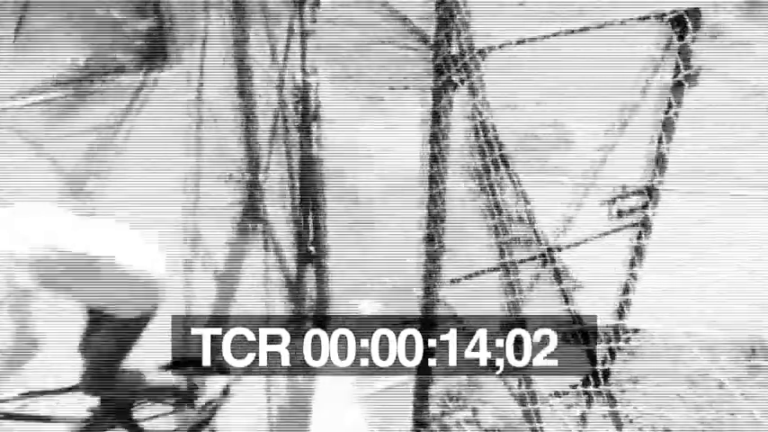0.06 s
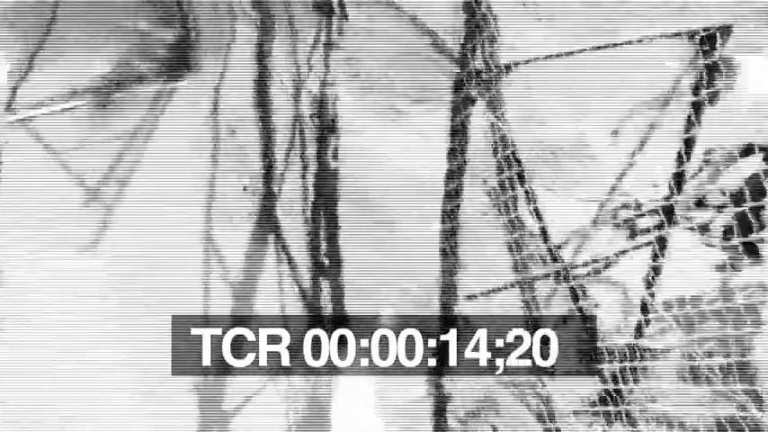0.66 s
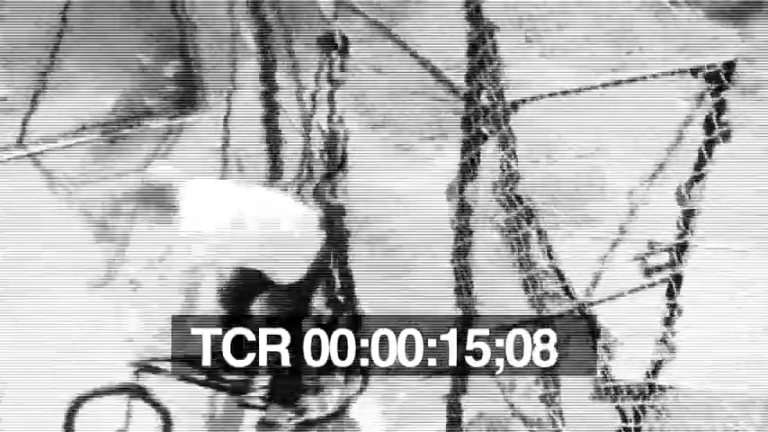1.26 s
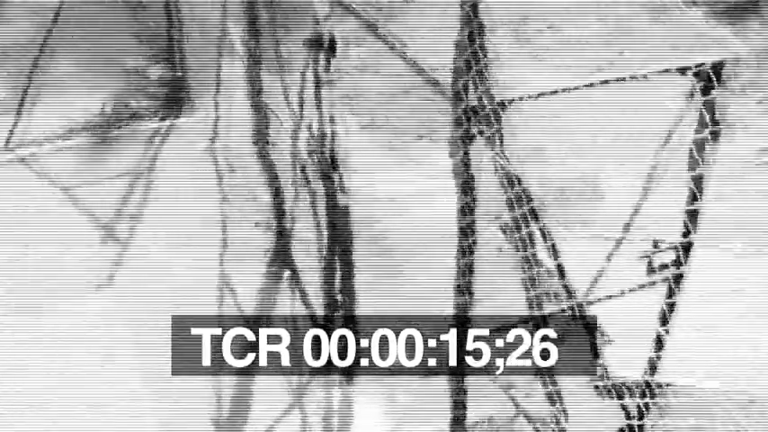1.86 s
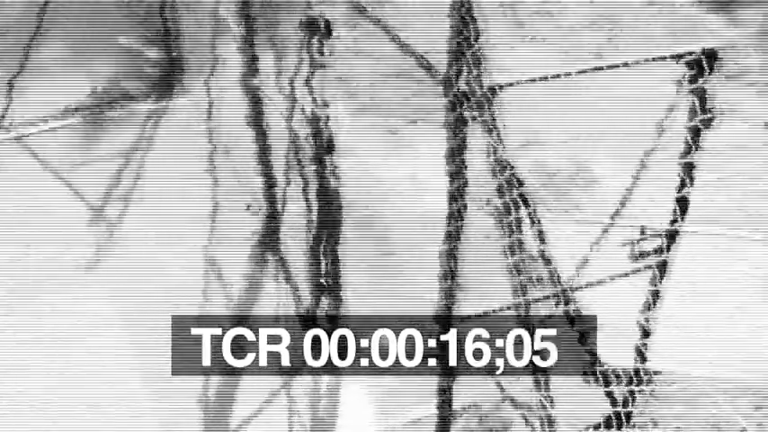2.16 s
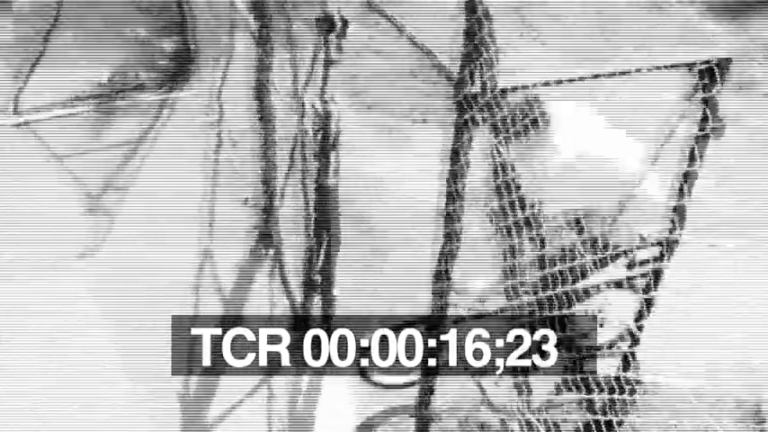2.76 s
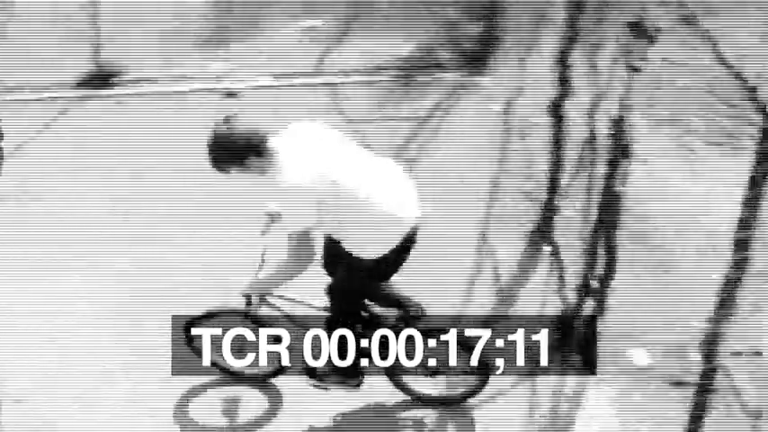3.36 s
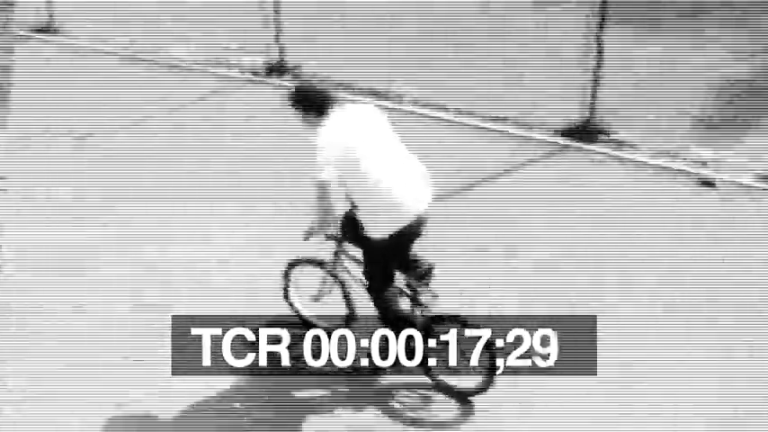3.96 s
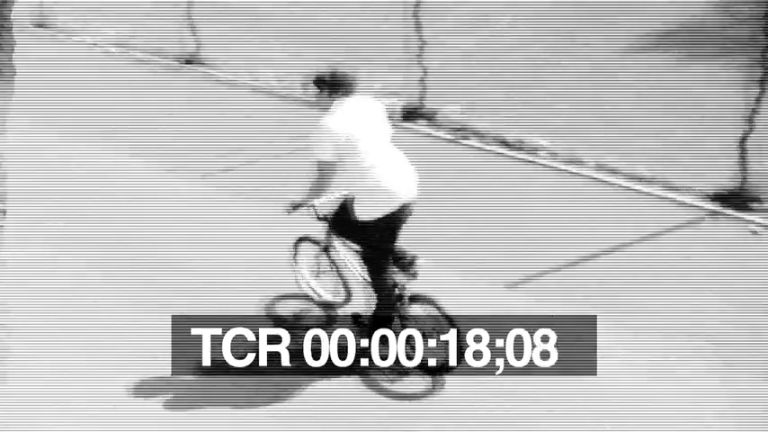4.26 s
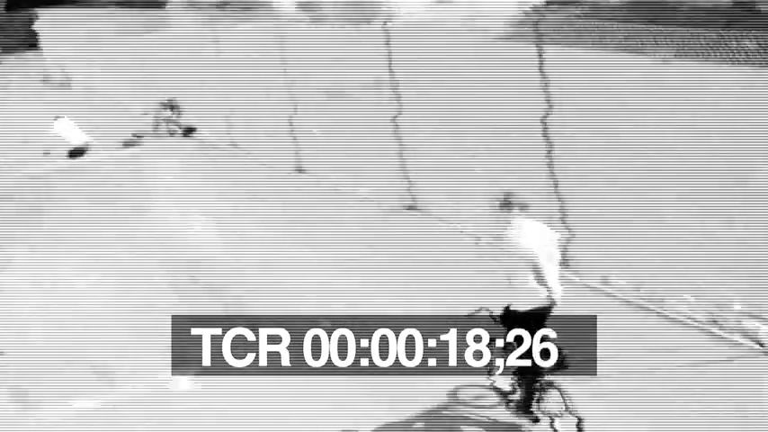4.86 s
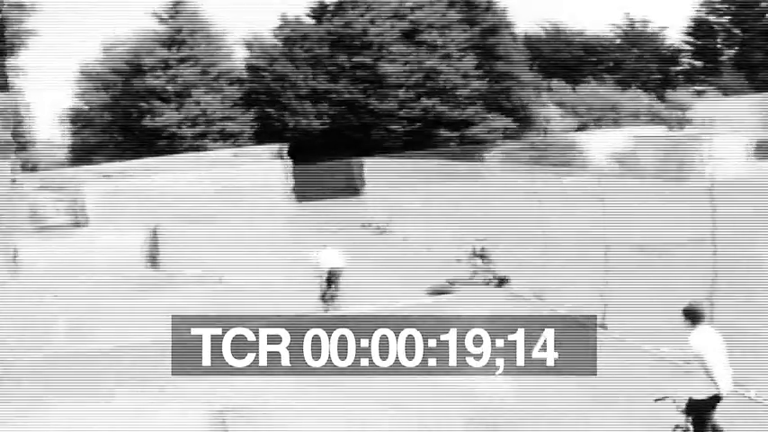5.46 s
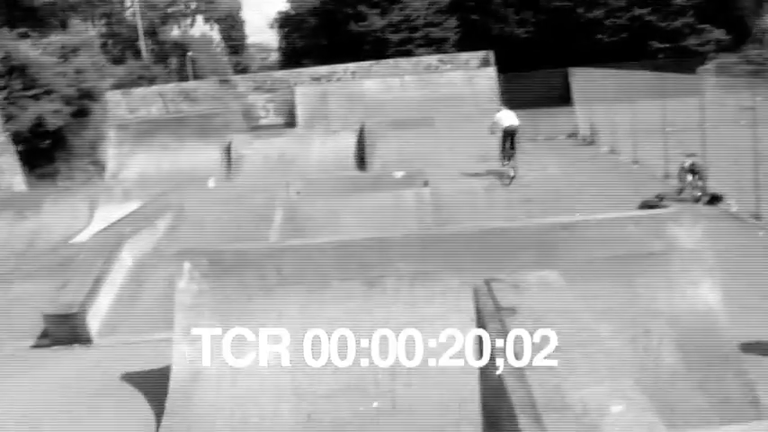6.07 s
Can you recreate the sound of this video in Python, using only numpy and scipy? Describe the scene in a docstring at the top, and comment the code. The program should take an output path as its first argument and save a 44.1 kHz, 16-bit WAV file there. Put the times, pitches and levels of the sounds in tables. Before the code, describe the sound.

Bikes coast past one after another at an outdoor concrete skate park. Each pass swells and fades, with freewheels ticking faster and slower over the rush of tyres. Chains and frames clack, and gusts thump the microphone, mostly on the left. Past the middle a rider pedals briefly and the chain jangles. Near the end a bike lands with a woody crack as another pass builds.

```python
"""BMX bikes coast past one after another at an outdoor concrete skate park. From the start, each pass
swells and fades: freewheel pawls tick with wheel speed and ring the hub, tyres roar, chains and frames
clack. Gusts thump the microphone, mostly its left port, hardest near 0.4 s. A slack chain ticks from
1.6 s; rubber squeaks at 3 s. Around 4 s a rider pedals: the pawls fall silent and the chain jangles.
At 5.8 s a bike lands with a woody crack as the last pass swells."""
import sys
import numpy as np
from scipy import signal
from scipy.fft import rfft, irfft, next_fast_len
from scipy.io import wavfile
from scipy.ndimage import uniform_filter1d

SR = 44100
rng = np.random.default_rng(int(sys.argv[2]) if len(sys.argv) > 2 else 0)


def wrap_up_sound(samples):
    """Save the sound to the file named by the first command line argument, as 16-bit audio."""
    columns = np.atleast_2d(samples).T
    # keep every value between -1 and 1, then stretch to whole-number steps
    tamed = np.clip(columns, -1, 1)
    steps = np.round(tamed * 32767).astype(np.int16)
    wavfile.write(sys.argv[1], SR, steps)


N = 270333
TIME = np.arange(N) / SR
PASS_CURVE, GUST_CURVE = 0.91, 1.7   # swell exponents: passes near linear, gusts pointed

# Spectra of the sources. Each row: frequency in Hz, relative density in dB.
AIR_SPECTRUM = [(40, 3), (120, -4), (400, -18), (1000, -7.5), (3000, -10.5), (8000, -16.5), (15500, -20.5)]
WIND_SPECTRUM = [(24, -99), (45, -34), (114, -8.5), (165, 1.5), (290, 5), (450, -3.5), (590, -10.5),
                 (760, -22.5), (930, -24.5), (1300, -40), (1690, -55), (2860, -120)]
TYRE_SPECTRUM = [(50, -25), (150, -8), (300, -5), (480, 2), (760, -2), (1160, -4.5), (2000, -10),
                 (3000, -9.5), (5400, -19), (7500, -21.5), (15500, -38.5)]
GRIT_SPECTRUM = [(1000, -36), (2500, -2), (5000, -3), (8000, 0), (12000, -7.5), (15500, -3)]
WOODY_SPECTRUM = [(290, -16), (500, -3.5), (900, 2.5), (1340, -0.5), (1990, -5.5), (2310, -15), (3130, -16),
                  (4730, -7), (6340, -15), (8840, -29), (15500, -40)]
FRAME_SNAP_SPECTRUM = [(880, -22), (1500, -23), (2720, 8), (3540, 3.5), (5610, -3.5), (6430, 2.5),
                       (8460, 0), (10100, -1), (15500, -18)]
FRAME_KNOCK_SPECTRUM = [(290, -37), (500, -1), (1120, -12.5), (1320, -1), (1740, 0), (2010, -1), (2280, -3),
                        (2600, -42), (3380, -45), (5720, -120)]
SPROCKET_SPECTRUM = [(880, -37), (1500, -3.5), (2020, -3), (2360, -6.5), (2930, 4.5), (3970, -20),
                     (4980, -10), (6470, -10), (7500, -13), (8700, -13.5), (9820, -18), (10200, -27),
                     (12000, -25), (15600, -43), (22000, -120)]
CHAIN_SPECTRUM = [(2000, -23), (4000, 3.5), (8000, -5.5), (11800, 1.5), (14500, -21), (15500, 4)]

# Gusts, mostly bike wakes. Each row: start, peak and end in seconds, level in dB.
GUSTS = [(-0.35, 0.41, 0.94, -35), (0.9, 1.45, 2.25, -39), (1.88, 2.4, 2.93, -41), (3.13, 3.45, 3.46, -65),
         (3.4, 4.22, 4.57, -41.5), (4.5, 4.76, 4.93, -54), (4.6, 5.35, 5.9, -67.5), (5.78, 5.81, 6.16, -46)]
# Wind at the two ports. Each row: time in seconds, left over right in dB, deep bass gain in dB.
WIND_BALANCE = [(0, 20, 9.5), (.8, 12, 3), (1.401, 10, 1), (2, 10, 7), (2.801, 7, 5), (3.3, 1, 13.5),
                (4.2, 8, 8), (4.5, 0, 11), (5.6, 0.5, 9), (5.9, 0.5, 8.5), (6.03, -24, 10.5),
                (6.13, 10.5, 10)]
# Cavities behind the microphone grille. Each row: frequency in Hz, gain in dB.
HOUSING_MODES = [(450, -5.5), (587, -6), (727, -15), (775, -4.5)]
# Big eddies; smaller ones sound higher.
# Each row: time in seconds, level in dB, nominal pitch in Hz, swirl length in seconds.
THUMPS = [(0.044, -22, 343, 0.019), (0.099, -33, 260, 0.0048), (0.143, -22.0, 274, 0.0054),
          (0.164, -26, 220, 0.0029), (0.191, -24.5, 250, 0.024), (0.244, -20.5, 212, 0.038),
          (0.296, -17.5, 277, 0.028), (0.312, -19.0, 230, 0.024), (0.362, -14.5, 283, 0.059),
          (0.389, -5, 346, 0.026), (0.405, -8.5, 422, 0.026), (0.418, -13, 312, 0.038),
          (0.431, -16.5, 380, 0.018), (0.453, -12, 290, 0.055), (0.528, -12.5, 340, 0.0044),
          (0.538, -12, 320, 0.011), (0.563, -21, 280, 0.053), (0.578, -32, 370, 0.023),
          (0.599, -21, 372, 0.0092), (0.613, -21, 347, 0.0032), (0.66, -23, 338, 0.0059),
          (0.689, -38, 240, 0.017), (0.71, -32.0, 280, 0.005), (0.849, -43, 270, 0.011),
          (0.897, -39.5, 280, 0.009), (0.946, -33.5, 423, 0.004), (0.976, -42.5, 350, 0.007),
          (1.042, -42, 250, 0.03), (1.077, -36, 260, 0.03), (1.111, -36, 280, 0.02),
          (1.125, -42, 278, 0.007), (1.204, -31, 300, 0.015), (1.227, -27.5, 260, 0.025),
          (1.285, -23, 306, 0.033), (1.323, -24.5, 260, 0.028), (1.372, -21, 336, 0.023),
          (1.403, -14.5, 435, 0.0068), (1.425, -16.5, 304, 0.054), (1.443, -22.0, 420, 0.021),
          (1.462, -20, 332.6, 0.025), (1.474, -24, 330, 0.0037), (1.496, -23, 334, 0.032),
          (1.544, -15, 400, 0.011), (1.56, -14.5, 368, 0.012), (1.581, -21.5, 320, 0.0044),
          (1.631, -29, 300, 0.018), (1.663, -18.5, 300, 0.036), (1.68, -20, 310, 0.038),
          (1.692, -27, 290, 0.007), (1.725, -26, 313, 0.04), (1.737, -25.5, 302, 0.04),
          (1.826, -27, 363, 0.032), (1.847, -28.5, 292.4, 0.009), (1.903, -33, 356, 0.0071),
          (1.927, -31.5, 368, 0.025), (1.999, -41, 367, 0.008), (2.021, -38, 370, 0.012),
          (2.091, -33.5, 390, 0.004), (2.101, -30.5, 332, 0.045), (2.227, -27.0, 286, 0.0033),
          (2.295, -29.5, 320, 0.017), (2.324, -19.5, 313, 0.006), (2.346, -27, 300, 0.015),
          (2.362, -19.5, 328, 0.008), (2.376, -27, 322, 0.04), (2.392, -23, 283, 0.008),
          (2.413, -25.5, 322, 0.029), (2.445, -26.5, 400, 0.022), (2.544, -19.5, 290, 0.033),
          (2.561, -19.5, 296, 0.0032), (2.604, -30.5, 271, 0.007), (2.688, -29, 286.7, 0.014),
          (2.707, -27, 276, 0.017), (2.749, -28, 350, 0.04), (2.768, -24.5, 258, 0.017),
          (2.787, -33.5, 294, 0.037), (2.801, -27.5, 287, 0.0056), (2.839, -34.5, 288, 0.01),
          (2.868, -41, 240, 0.014), (2.884, -38, 290, 0.0052), (2.905, -36, 306, 0.0065),
          (3.77, -28.5, 327, 0.008), (3.936, -28, 260, 0.031), (3.964, -27.0, 252, 0.025),
          (4.026, -36, 290, 0.017), (4.105, -23, 470, 0.0051), (4.125, -21.5, 300, 0.007),
          (4.154, -20, 290, 0.03), (4.173, -26, 262, 0.035), (4.198, -19.0, 294, 0.012),
          (4.224, -26.0, 280, 0.007), (4.254, -21, 365, 0.02), (4.271, -27, 330, 0.04),
          (4.305, -22.5, 255, 0.053), (5.616, -40, 340, 0.04), (5.629, -48.5, 326, 0.033),
          (5.805, -37, 282, 0.015), (5.836, -37, 275, 0.024), (5.892, -38, 340, 0.015),
          (5.949, -38, 265, 0.038), (6.032, -27.5, 220, 0.032), (6.042, -28.5, 262, 0.004)]
# Tyres crossing the concrete. Each row: start, peak and end in seconds, level in dB.
TYRE_RUNS = [(-0.03, 0.43, 0.8, -46.5), (1.04, 1.42, 1.98, -53), (1.99, 2.38, 3.14, -54),
             (2.94, 3.02, 3.15, -57), (3.18, 4.44, 4.91, -45), (4.73, 5.3, 5.78, -58),
             (5.72, 6.12, 6.5, -52)]
# Rubber slip: start, peak and end in seconds.
SQUEAK_S = (2.9, 3.05, 3.19)
# Short hollow knocks: a sharp wind slap on the microphone at 0.4 s, then wheels bumping ramps.
# Each row: time in seconds, level in dB, pitch in Hz, t60 in seconds.
HOLLOW_KNOCKS = [(0.402, -19, 800, .012), (0.944, -36.5, 586, 0.013), (0.972, -54, 600, .01),
                 (2.964, -49, 724, 0.05), (2.977, -41, 510, 0.048), (3.022, -41.5, 467, 0.029),
                 (3.034, -50, 466, 0.048), (3.055, -49, 447, .025), (3.817, -44, 627, 0.1),
                 (3.889, -37, 620, 0.076), (5.588, -39, 570, 0.027), (5.599, -35.5, 540, 0.027)]
# Touchdown of each wheel. Each row: time in seconds, level in dB, t60 in seconds.
LANDING_HITS = [(5.7955, -30.5, 0.0088), (5.7982, -38, 0.013)]
# Chain and frame hits. Each row: time in seconds, level in dB, low knock offset in dB, t60 in seconds.
CLACKS = [(0.486, -34, -20, 0.045), (0.5348, -25.5, -11, 0.027), (0.7563, -29, -5.5, 0.014),
          (0.791, -52, 8, 0.022), (1.061, -44, 0, 0.036), (1.091, -56, 14, 0.02), (1.1154, -45, -4, 0.031),
          (1.1544, -41, 4.5, 0.055), (1.824, -38.5, -6, 0.017), (2.051, -35.5, -10, 0.016),
          (2.2655, -25.5, -4, 0.029), (2.381, -28.5, -2, 0.047), (2.574, -31, -4, 0.025),
          (2.964, -56, 15, 0.04), (2.974, -55, 11, 0.025), (3.713, -39, -16, 0.024),
          (3.7322, -44, -14, 0.02), (3.7566, -33.5, -2, 0.026), (4.012, -27, -4.5, 0.042),
          (5.7956, -30.5, -1, 0.017), (5.816, -44, 2, 0.02), (6.0524, -31, -14, 0.025)]
# Chain on sprocket. Each row: time in seconds, level in dB, t60 in seconds.
CLINKS = [(3.028, -35, 0.069), (3.063, -45, 0.05), (3.8338, -29, 0.033), (4.0486, -25, 0.08),
          (4.078, -31, 0.11), (4.104, -35.5, 0.08)]
# Chain on its guide: first tick and interval in seconds, first level in dB, loss per tick in dB.
CHAIN_RUN = (1.58, .041, -40.5, 1)

# Spectra radiated by hub and frame. Each row: frequency in Hz, relative density in dB.
HUB_A = [(590, -29), (1000, -11), (1230, -18), (1530, -5.5), (1820, 1), (2390, 0.5), (2680, -4.5),
         (2970, 0), (4540, -0.5), (5340, -9), (5980, -4.5), (7110, 3.5), (11900, -10.5), (13100, -10),
         (15500, -19)]
HUB_B = [(880, -34), (1500, -3), (1860, -5.5), (2150, -10), (3090, -1.5), (4480, -7), (4850, -15),
         (5720, -11), (6560, -18.5), (7380, -7.5), (8210, -12), (11100, -13.5), (15500, -17)]
HUB_C = [(590, -37), (1000, -12), (1160, -21), (1660, -9), (2210, -9), (2970, -5.5), (3610, -3.5),
         (4600, -3), (5460, -9), (6790, -8.5), (9360, -12), (11200, -11.5), (15500, -21)]
HUB_D = [(590, -37), (1000, -23), (1410, -9), (2280, 1.5), (2560, -14), (2870, -1.5), (3610, -7),
         (4190, -6), (4550, -6.5), (5400, -10.5), (6200, -6), (6700, -7), (8300, -6.5), (10200, -10),
         (11200, -7), (12600, -9), (15500, -15.5)]
HUB_E = [(880, -14.5), (1500, -5), (1840, -6), (2860, -1), (3540, -8), (4230, -4.5), (5400, -10.5),
         (7900, -5.5), (8710, -12), (11000, -6.5), (12400, -12), (14800, -12.5), (15500, -17)]
HUB_F = [(590, -32), (1000, -18), (1920, -15), (2360, -9), (2710, -11), (2870, -6), (3450, -3), (3900, -5),
         (4350, -1), (4950, -4), (5950, -8.5), (6900, -6.5), (8300, -10.5), (14600, -18), (15500, -21)]
# Hub modes rung by a pawl. Each row: frequency in Hz, relative level in dB.
RING_A = [(2410, 5), (2880, -12), (3300, 6), (6960, -6), (7660, -2), (9430, -18), (12800, -17)]
RING_B = [(1870, -1), (2950, -1), (3250, 0.5), (3700, -10), (7500, -18)]
RING_C = [(3060, 4.5), (3530, 10), (3680, 4), (4350, -7), (4550, -2), (6900, -25), (11300, -9)]
RING_D = [(2520, -2), (2860, 2), (3050, -4), (3250, -3), (4170, -2), (6050, -7), (6310, -2.5), (11200, -15)]
RING_E = [(2550, -6), (2800, 0), (3040, 5), (3730, -5), (6700, 1), (7710, -12), (8090, -13), (9510, -18),
          (11200, -8), (14600, -11)]
RING_F = [(2960, -1), (3590, 7), (3850, -6), (4460, -5), (6950, 11), (10200, -12)]
RING_G = [(3100, -5), (3520, 5), (3880, 3), (4200, -7), (4560, 3), (7050, 4), (7800, -8)]
# Wheels speed up down a ramp and slow up the next. Each row: time in seconds, pawl ticks per second.
TICK_RATE = [(0.1, 103), (0.5, 78), (0.66, 102), (0.85, 39.6), (1.15, 48), (1.38, 200), (1.95, 86),
             (2.34, 191), (2.8, 128), (3.05, 28.4), (3.27, 69), (3.43, 111), (3.6, 92), (3.74, 43.6),
             (4.15, 57), (4.25, 105), (4.45, 93), (4.62, 117), (4.73, 101), (4.8, 188), (5.3, 165),
             (5.55, 126), (5.85, 79), (6.02, 73)]
# Pawls locked and silent: start and end in seconds.
PEDALLING_S = (3.775, 4.155)
# Passes. Each row: start, closest point and end in seconds, level in dB, loss on every second tick in dB,
# treble gain once the hub has turned in dB, left over right in dB, right lag in ms, hub spectrum,
# ring level in dB, hub modes.
BIKE_PASSES = [(-0.04, 0.454, 0.79, -38, -1.5, 4, 1, 0.082, HUB_A, -24, RING_A),
               (1.129, 1.4, 1.93, -48, 0, -1, -2.5, -0.18, HUB_B, -2.5, RING_B),
               (2.029, 2.367, 3.1, -43, -1, -1, 4.5, 0.26, HUB_C, -15, RING_C),
               (3.19, 3.608, 3.84, -45, -2, 2, -0.5, 0.29, HUB_D, -6.5, RING_D),
               (3.98, 4.28, 4.88, -41, -0.5, -2, 0, 0.13, HUB_E, -10, RING_E),
               (4.738, 4.781, 4.89, -50, 1, 1.5, 9, 0.243, HUB_C, -9, RING_C),
               (4.88, 5.29, 5.71, -46.5, 0, 1, 7, 0.23, HUB_F, -10, RING_G),
               (5.663, 6.056, 6.36, -46, -0.5, 2, 6.5, 0.26, HUB_F, -10.5, RING_F)]


def from_db(db):
    """Decibels to gain."""
    return 10 ** (np.asarray(db) / 20)


def unit_rms(x):
    """Scale to rms 1."""
    return x / np.sqrt(np.mean(x ** 2) + 1e-20)


def drift(rate_hz):
    """Random wander of rms 1, rate_hz new values a second."""
    return unit_rms(np.interp(TIME * rate_hz, np.arange(4096), rng.standard_normal(4096)))


def swell(start_s, peak_s, end_s, curve=1):
    """Rise from 0 to 1 and fall back; a higher curve is more pointed."""
    rise = (TIME - start_s) / (peak_s - start_s)
    fall = (end_s - TIME) / (end_s - peak_s)
    return np.clip(np.minimum(rise, fall), 0, 1) ** curve


def swells(rows, curve):
    """Power sum of overlapping swells, as amplitude."""
    return np.sqrt(sum((from_db(db) * swell(*times_s, curve)) ** 2 for *times_s, db in rows))


def impulses(times_s, sizes):
    """Single-sample blows."""
    out = np.zeros(N)
    out[np.clip(np.round(np.asarray(times_s) * SR).astype(int), 0, N - 1)] = sizes
    return out


def decay(blows, t60_s):
    """Exponential tail after each blow."""
    return signal.lfilter([1], [1, -from_db(-60 / (t60_s * SR))], blows + 1e-18)


def resonate(x, hz, width_hz):
    """Two-pole resonance, peak gain 1."""
    radius = np.exp(-np.pi * width_hz / SR)
    feedback = [1, -2 * radius * np.cos(2 * np.pi * hz / SR), radius ** 2]
    return signal.lfilter((1 - radius ** 2) / 2 * np.array([1, 0, -1]), feedback, x)


def waver(x, bands_hz, q, depth_db, rate_hz):
    """Let the gain of each band drift on its own."""
    for hz in bands_hz:
        x = x + (from_db(depth_db * drift(rate_hz)) - 1) * resonate(x, hz, hz / q)
    return x


def body(x, spectrum, size=4096):
    """Minimum-phase, unit-energy resonator with the given spectrum."""
    hz, db = np.transpose(spectrum)
    bins_hz = np.maximum(np.arange(size // 2 + 1) * SR / size, 1)
    cepstrum = irfft(np.log(from_db(np.interp(np.log(bins_hz), np.log(hz), db))))
    cepstrum[1:size // 2] *= 2
    cepstrum[size // 2 + 1:] = 0
    response = irfft(np.exp(rfft(cepstrum)))
    response /= np.linalg.norm(response)
    return signal.fftconvolve(np.atleast_2d(x), [response], axes=1)[:, :np.shape(x)[-1]]


def pan(side_db):
    """Left and right gains, constant power."""
    gains = from_db(np.array([[.5], [-.5]]) * side_db)
    return gains / np.sqrt(np.mean(gains ** 2, axis=0))


def two_ports(direct, scattered, direct_share, lag_ms=0):
    """Direct sound reaches the right port lag_ms late; scattered sound differs at each port."""
    time_s = TIME[:len(direct)]
    late = np.interp(time_s - lag_ms / 1000, time_s, direct)
    return np.sqrt(direct_share) * np.array([direct, late]) + np.sqrt(1 - direct_share) * scattered


def random_impulses(rate_hz, spread_db):
    """Impulses of random sign and size at uneven intervals; rms 1."""
    count = np.floor(np.cumsum(rate_hz * from_db(4 * drift(rate_hz))) / SR)
    signed = np.diff(count, prepend=0) * rng.choice([-1, 1], N)
    return unit_rms(signed * from_db(spread_db * rng.standard_normal(N)))


def impacts(times_s, levels_db, t60s_s, spectrum, crack_db=1, tail_db=-20, tail_t60_s=0.27):
    """Sharp hits: hard crack, dense dying ring, faint tail."""
    sizes = from_db(levels_db)
    blows = impulses(times_s, sizes)
    envelope = sum(decay(impulses([s], size), t60_s) for s, size, t60_s in zip(times_s, sizes, t60s_s))
    ring = rng.standard_normal((3, N)) * (envelope + from_db(tail_db) * decay(blows, tail_t60_s))
    return body(two_ports(ring[0] + from_db(crack_db) * blows, ring[1:], direct_share=0.2), spectrum)


def air(level_db=-70):
    """Still air of the park: faint, steady noise."""
    return from_db(level_db) * body(rng.standard_normal((2, N)), AIR_SPECTRUM)


def puff(pitch_hz, average_hz=298.7, edge_hz=76, size=2048):
    """Push and pull of one eddy at the port: the wind spectrum stretched about a shared low edge."""
    hz, db = np.transpose(WIND_SPECTRUM)
    stretch = np.log(pitch_hz / edge_hz) / np.log(average_hz / edge_hz)
    bins_hz = np.maximum(np.arange(size // 2 + 1) * SR / size, 1)
    pulse = irfft(from_db(np.interp(np.log(bins_hz / edge_hz), stretch * np.log(hz / edge_hz), db)))
    return np.roll(pulse / pulse[0], size // 2) * np.hanning(size)


def thumps(swirl_db=-31, swirl_delay_s=0.0022, reach_samples=4096):
    """Each big eddy thumps at its own pitch and drags a swirl of weaker ones."""
    swirl = random_impulses(rate_hz=190, spread_db=2) * from_db(swirl_db)
    out = np.zeros(N)
    for (time_s, db, pitch_hz, swirl_s), sign in zip(THUMPS, rng.choice([-1, 1], len(THUMPS))):
        centre = int(time_s * SR)
        span = slice(max(centre - reach_samples, 0), centre + reach_samples)
        age_s = TIME[span] - time_s - swirl_delay_s
        eddies = swirl[span] * (age_s > 0) * np.sqrt(np.clip(1 - age_s / swirl_s, 0, 1))
        eddies[centre - span.start] += sign
        out[span] += from_db(db) * signal.fftconvolve(eddies, puff(pitch_hz), "same")
    return out


def housing(x):
    """Cavities of the microphone housing ring after each puff."""
    return x + sum(from_db(db) * resonate(x, hz, width_hz=16) for hz, db in HOUSING_MODES)


def wind_at_ports(pressure, deep_hz=130, lead_rad=1.16):
    """Deep bass is equally strong at both ports; the rest is louder to windward. A windward left leads."""
    analytic = signal.hilbert(pressure, next_fast_len(N))[:N]
    deep = signal.sosfiltfilt(signal.butter(2, deep_hz, fs=SR, output="sos"), analytic)
    times_s, side_db, deep_db = np.transpose(WIND_BALANCE)
    side_db, deep_db = np.interp(TIME, times_s, side_db), np.interp(TIME, times_s, deep_db)
    phase_turn = np.exp(1j * np.array([[0], [-1]]) * lead_rad * np.clip(side_db / 5, 0, 1))
    return np.real(phase_turn * (deep * from_db(deep_db) + pan(side_db) * (analytic - deep)))


def wind(calm_db=-73, flutter_db=2.5, breakup_db=-50, port_noise_db=-29.5):
    """Light air flows smoothly; a gust breaks into eddies whose hollow colour keeps shifting."""
    gust_db = 20 * np.log10(swells(GUSTS, GUST_CURVE) + from_db(calm_db)) + flutter_db * drift(45)
    eddy_share = 1 / (1 + from_db(2 * (breakup_db - gust_db)))
    eddies = np.sqrt(eddy_share) * random_impulses(rate_hz=130, spread_db=2.5)
    smooth = np.sqrt(1 - eddy_share) * rng.standard_normal(N)
    buffet = body((eddies + smooth) * from_db(gust_db), WIND_SPECTRUM)[0]
    buffet = waver(buffet, (200, 300, 440), q=4, depth_db=2.5, rate_hz=25)
    pressure = housing(buffet + thumps())
    port_noise = body(rng.standard_normal((2, N)) * from_db(gust_db + port_noise_db), WIND_SPECTRUM)
    return wind_at_ports(pressure) + port_noise


def tyres(gain_db=3, bumps_db=1.5):
    """Tread on rough concrete: a broad roar that wavers with the surface."""
    tread = rng.standard_normal((3, N))
    roar = body(two_ports(tread[0], tread[1:], direct_share=0.46), TYRE_SPECTRUM)
    return roar * swells(TYRE_RUNS, PASS_CURVE) * from_db(gain_db + bumps_db * drift(40))


def grit(gain_db=-13, t60_s=0.01):
    """Sand grains snap under the rolling tyres."""
    grains = np.abs(random_impulses(rate_hz=70, spread_db=4))
    snaps = unit_rms(rng.standard_normal((3, N)) * decay(grains, t60_s))
    crackle = body(two_ports(snaps[0], snaps[1:], direct_share=0.29), GRIT_SPECTRUM)
    return crackle * swells(TYRE_RUNS, PASS_CURVE) * from_db(gain_db)


def squeak(pitch_hz=2110, level_db=-59):
    """Rubber slips briefly and sings one rough note."""
    note = unit_rms(resonate(rng.standard_normal((2, N)), pitch_hz, width_hz=65))
    return from_db(level_db) * swell(*SQUEAK_S) * note


def hollow_knocks(attack_db=-12.5):
    """A wind slap on the microphone, then wheels on ramps: each a dull attack and a short, hollow note."""
    notes = sum(decay(impulses([s], from_db(db)), t60_s) * np.sin(2 * np.pi * hz * (TIME - s))
                for s, db, hz, t60_s in HOLLOW_KNOCKS)
    times_s, levels_db, _, t60s_s = np.transpose(HOLLOW_KNOCKS)
    return notes + impacts(times_s, levels_db + attack_db, t60s_s / 2, WOODY_SPECTRUM)


def landing():
    """Two wheels hit the ramp, one just after the other: a hard, woody crack."""
    return impacts(*np.transpose(LANDING_HITS), WOODY_SPECTRUM)


def frame_clacks(snap_db=-8.5, knock_db=-9.5):
    """Chain and frame clack: a bright snap over a lower knock."""
    times_s, levels_db, offsets_db, t60s_s = np.transpose(CLACKS)
    snaps = impacts(times_s, levels_db + snap_db, t60s_s, FRAME_SNAP_SPECTRUM)
    knocks = impacts(times_s, levels_db + offsets_db + knock_db, t60s_s, FRAME_KNOCK_SPECTRUM)
    return snaps + knocks


def sprocket_clinks(gain_db=-8.5):
    """The chain jangles on the sprocket."""
    times_s, levels_db, t60s_s = np.transpose(CLINKS)
    return impacts(times_s, levels_db + gain_db, t60s_s, SPROCKET_SPECTRUM)


def chain_ticks(count=10, t60_s=0.0077, jitter_s=0.0018):
    """The slack chain ticks against its guide, nearly evenly, ever softer."""
    first_s, interval_s, first_db, loss_db = CHAIN_RUN
    tick = np.arange(count)
    times_s = first_s + interval_s * tick + jitter_s * rng.standard_normal(count)
    return impacts(times_s, first_db - loss_db * tick, [t60_s] * count, CHAIN_SPECTRUM)


def pawls(span, limp_db, jitter=0.1, spread_db=3):
    """Two pawls drop into the teeth in turn, limp_db apart; mean power is held even."""
    rate_hz = np.interp(TIME[span], *np.transpose(TICK_RATE)) * (1 + jitter * drift(60)[span])
    tooth = np.floor(np.cumsum(rate_hz) / SR)
    strike_db = spread_db * rng.standard_normal(len(tooth)) - limp_db * (tooth % 2)
    ticks = np.diff(tooth, prepend=-1) * from_db(strike_db)
    return ticks / np.sqrt(uniform_filter1d(ticks ** 2, size=4096) + 1e-5)


def hub(ticks, spectrum, ring_db, modes, lag_ms, t60_s=0.04, rub_db=-1.5, dense_db=-0.5, ring_q=50):
    """Each tick scrapes, stirs the wheel's dense modes and rings the strong ones; the bearing rubs on."""
    shape = (3, len(ticks))   # direct, scattered left, scattered right
    bursts = unit_rms(np.sqrt(decay(ticks ** 2, t60_s / 2)))
    scrape = unit_rms(rng.standard_normal(shape) * np.sqrt(bursts ** 2 + from_db(rub_db) ** 2))
    wheel_response = rng.standard_normal((3, 2048)) * from_db(-60 * TIME[:2048] / t60_s)
    dense = unit_rms(signal.oaconvolve([ticks], wheel_response, axes=1)[:, :len(ticks)])
    ring = np.zeros(shape)
    for hz, db in modes:
        strikes = ticks * from_db(4 * rng.standard_normal(shape)) * rng.choice([-1, 1], shape)
        ring += from_db(db) * resonate(strikes, hz, hz / ring_q)
    sound = body(unit_rms(scrape + from_db(dense_db) * dense), spectrum)
    sound += from_db(ring_db) * unit_rms(ring)
    return unit_rms(two_ports(sound[0], sound[1:], direct_share=0.45, lag_ms=lag_ms))


def freewheels(gain_db=1, turn_s=0.18, treble_hz=5500):
    """Each coasting hub swells as it nears, shifts its treble as it turns, and fades as it leaves."""
    highpass = signal.butter(2, treble_hz, "high", fs=SR, output="sos")
    out = np.zeros((2, N))
    for start_s, closest_s, end_s, db, limp_db, facing_db, side_db, lag_ms, *hub_voice in BIKE_PASSES:
        span = (TIME > start_s) & (TIME < end_s)
        wheel = hub(pawls(span, limp_db), *hub_voice, lag_ms)
        treble_db = facing_db * np.tanh((TIME[span] - closest_s) / turn_s)
        wheel += (from_db(treble_db) - 1) * signal.sosfiltfilt(highpass, wheel)
        envelope = from_db(db) * swell(start_s, closest_s, end_s, PASS_CURVE)[span]
        out[:, span] += envelope * pan(side_db) * wheel
    # No two teeth strike alike: broad bands shimmer.
    out = waver(out, (2370, 3970, 6840, 12100), q=3, depth_db=1, rate_hz=70)
    # Narrow wheel and frame resonances come and go as the bike moves.
    out = waver(out, np.geomspace(1900, 9500, 14), q=14, depth_db=2.27, rate_hz=12)
    coasting = (TIME < PEDALLING_S[0]) | (TIME > PEDALLING_S[1])
    return out * uniform_filter1d(coasting.astype(float), size=1024) * from_db(gain_db)


def scene():
    """Park air, bikes and wind, in stereo."""
    park = air()
    rolling = freewheels() + tyres() + grit()
    hits = frame_clacks() + sprocket_clinks() + hollow_knocks() + landing()
    return park + rolling + hits + wind() + squeak() + chain_ticks()


def record(dry, ceiling=0.45, low_cut_hz=62, high_cut_hz=15900):
    """The microphone chain rounds the biggest thumps, drops the deep bass and cuts the top."""
    rounded = ceiling * np.tanh(dry / ceiling)
    thinned = signal.sosfilt(signal.butter(2, low_cut_hz, "high", fs=SR, output="sos"), rounded)
    return signal.sosfilt(signal.ellip(10, .2, 70, high_cut_hz, fs=SR, output="sos"), thinned)


dry = scene()
out = record(dry)
wrap_up_sound(out)
```